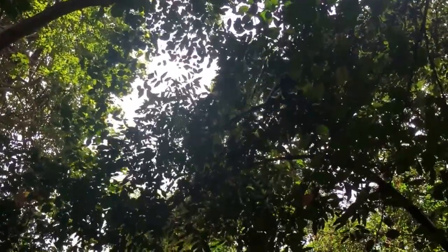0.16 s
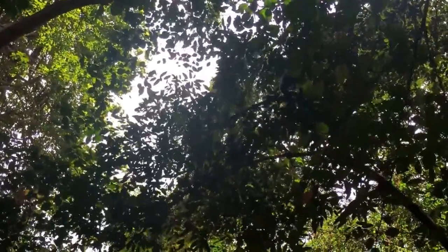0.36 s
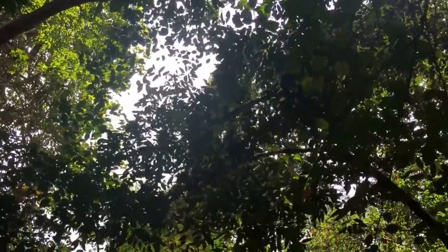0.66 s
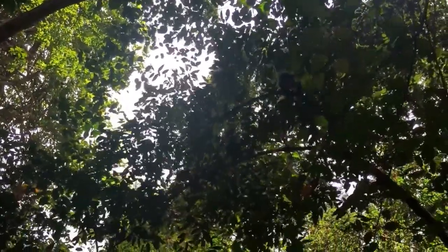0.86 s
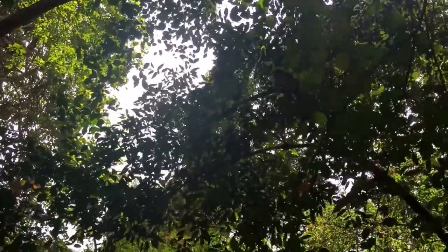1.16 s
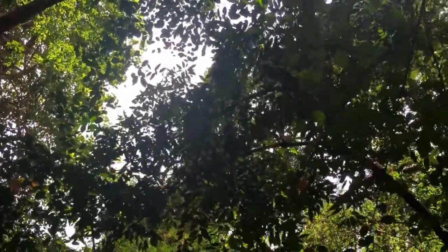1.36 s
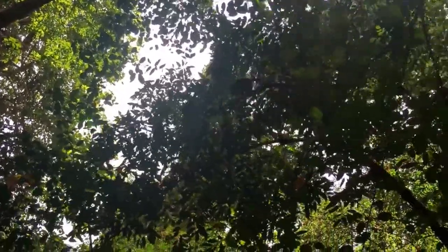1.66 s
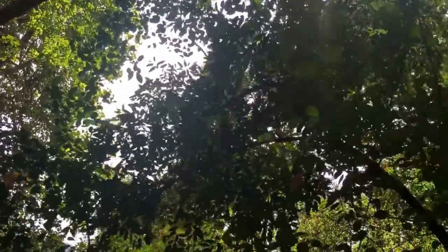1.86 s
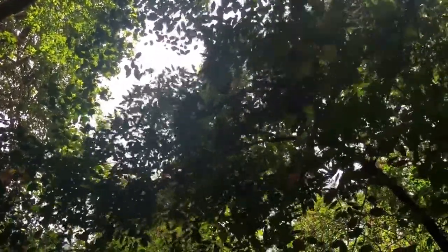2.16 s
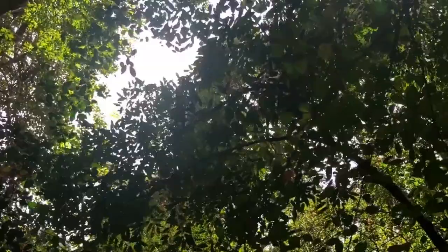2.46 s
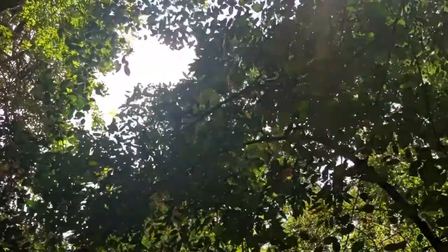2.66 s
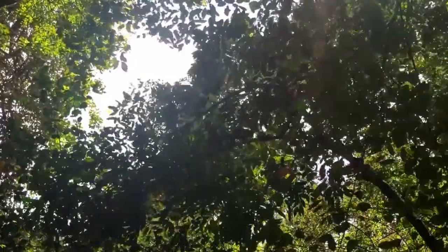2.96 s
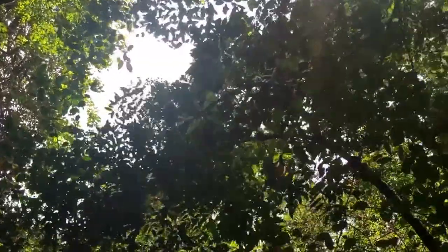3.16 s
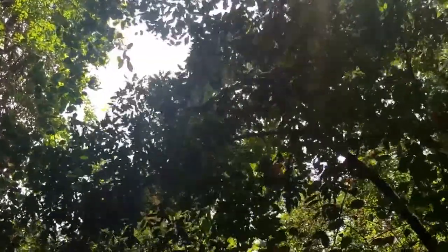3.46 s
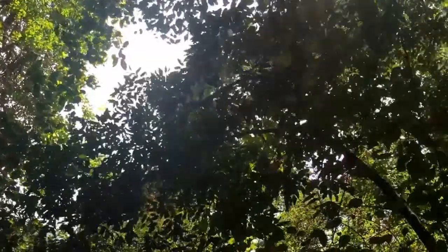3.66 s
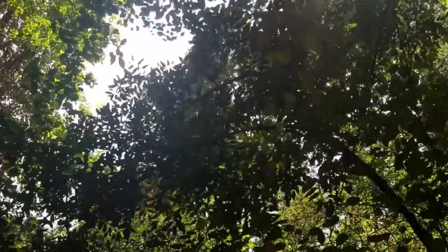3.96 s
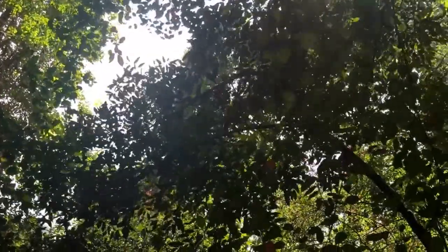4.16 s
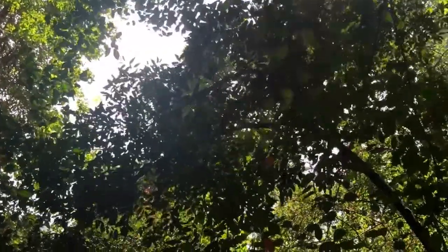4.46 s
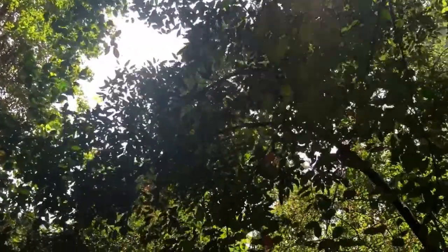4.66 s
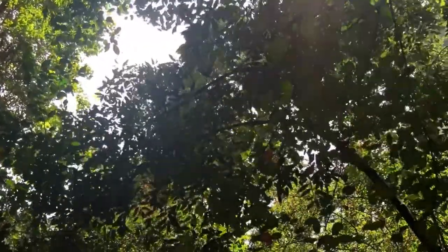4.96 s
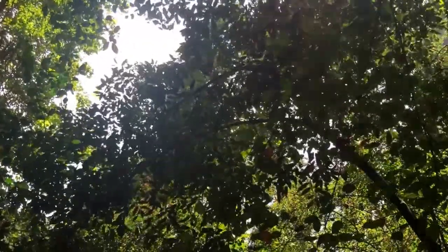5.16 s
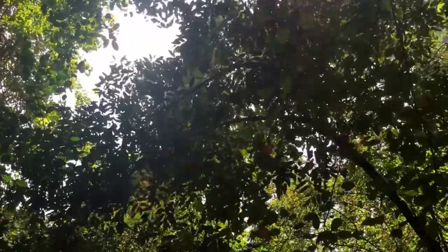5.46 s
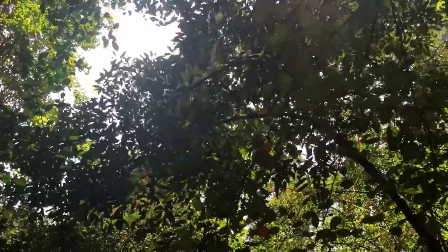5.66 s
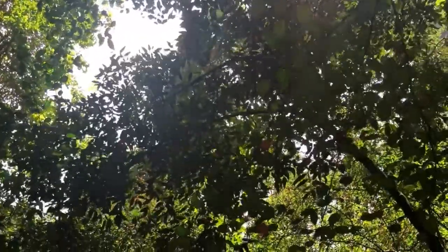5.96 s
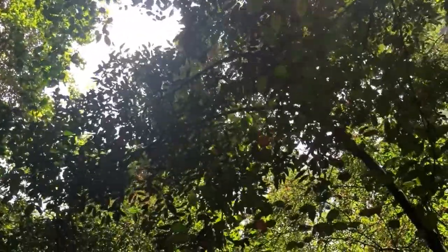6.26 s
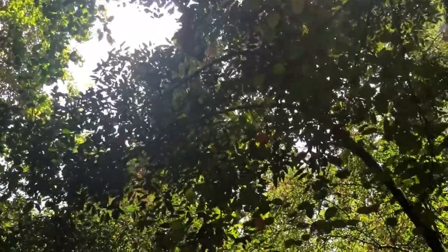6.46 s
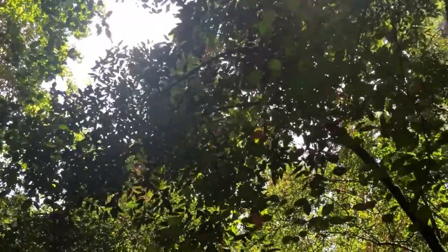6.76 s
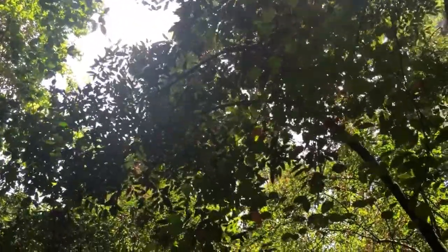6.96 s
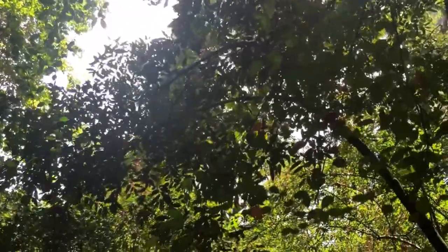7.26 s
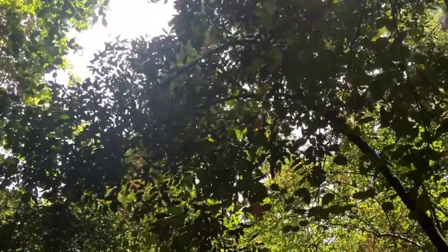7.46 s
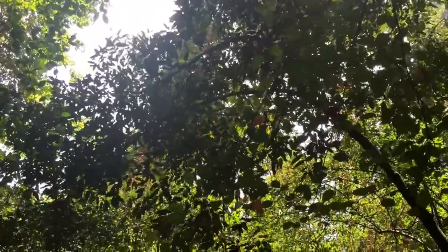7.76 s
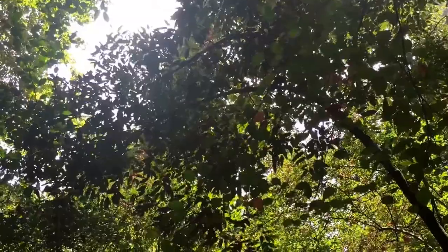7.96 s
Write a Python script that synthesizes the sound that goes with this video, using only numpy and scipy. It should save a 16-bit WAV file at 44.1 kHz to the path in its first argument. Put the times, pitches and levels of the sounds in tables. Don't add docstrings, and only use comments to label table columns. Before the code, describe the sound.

Under a leafy canopy outdoors, a dense insect chorus hisses steadily from start to finish, mostly bright and high, without distinct single chirps, gradually swelling to its fullest in the last seconds. A lower, drier insect band near 1.7 kHz rises to a peak around 2.2 s and settles by 3 s. Far away, a small engine throbs low and unevenly, fluttering and briefly dropping out, over a soft rumble of traffic and air with vague muffled murmurs of noise. Close by, leaves flick at 0.3 to 0.5 s with small twig clicks. From 1.05 s a stronger brush begins, a thick crackle with clustered snaps at 1.2 to 1.3 s and 1.6 to 1.75 s, easing until 2.8 s. Tiny rustles follow at 3.2, 5.7 and 7.4 s, with a last light touch and clicks around 8 s. The sound is natural, essentially mono, with close foliage against a distant background.

```python
import sys
import numpy as np
from scipy import signal
from scipy.fft import rfft, irfft
from scipy.io import wavfile
from scipy.ndimage import uniform_filter1d, map_coordinates

SR = 44100
rng = np.random.default_rng(int(sys.argv[2]) if len(sys.argv) > 2 else 0)


def pcm_store(signal):
    levels = np.round(np.clip(np.atleast_2d(signal), -1, 1) * 32767)
    wavfile.write(sys.argv[1], SR, levels.astype(np.int16).T)


def rack_gain(trim_db):
    fader = np.asarray(trim_db, float)
    return 10 ** (fader / 20)


N = 358077

# start_s [s], firing_hz [Hz], load_db [dB], facing_db [dB]
ENGINE_RUN = [(0, 74.7, -3, -1), (.5, 75.2, -2, 6), (.9, 75.53, -1, 7), (1.45, 75.26, 4.5, -8),
              (1.9, 73.8, -0.5, -4), (2.4, 75.65, -5, -9), (2.8, 77.3, -2.5, -2), (3.3, 75.44, 3, -2),
              (3.8, 73.86, 2, -3), (4.1, 76.15, -3, 2), (4.5, 77.06, -3.5, 8), (4.9, 78.1, 1.5, -4),
              (5.4, 78.2, 2, 4), (6.1, 77.9, 3, -5), (6.7, 75.5, 3, 4.5), (7.1, 73.65, 1.5, 6.5),
              (7.5, 74.23, 6, -1), (8.12, 74.15, 1, 4)]


def evened(x):
    return x / np.sqrt(np.mean(x ** 2) + 1e-20)


def curves(rows, t):
    s, *columns = np.transpose(rows)
    return [np.interp(t, s, column) for column in columns]


def smooth(points, hz):
    f, db = np.transpose(points)
    return rack_gain(np.interp(np.log(hz + 1), np.log(f + 1), db))


def humps(modes, hz):
    power = 0
    for centre_hz, width_hz, db in modes:
        offset = 2 * (hz - centre_hz) / width_hz
        power = power + (rack_gain(db) / (1 + offset ** 2) ** 1.014) ** 2
    return np.sqrt(power)


def above(x, hz):
    return signal.sosfiltfilt(signal.butter(2, hz / (SR / 2), "high", output="sos"), x)


def drift(shape, *spans):
    field = rng.standard_normal(shape)
    for axis, span in enumerate(spans):
        field = uniform_filter1d(uniform_filter1d(field, span, axis), span, axis)
    return evened(field)


def hiss(colour, table, patchy_db, flicker_db, size=512):
    speckle_db = 2.3
    hop = size // 4
    frames, hz = N // hop + 5, np.fft.rfftfreq(size, 1 / SR)
    shape = (len(hz), frames)
    patches = drift(shape, 6, 4096 // size)
    flicker = drift(frames, 2048 // size)
    z = rng.standard_normal(shape) + 1j * rng.standard_normal(shape)
    specks = drift(shape, 1, 6)
    gain_db = speckle_db * specks + patchy_db * patches + flicker_db * flicker
    z = z * colour(table, hz)[:, None] * rack_gain(gain_db)
    return evened(signal.istft(z, nperseg=size, noverlap=size - hop)[1][:N])


def throbs(t):
    # middle_s [s], lift_db [dB]
    beats = [(.07, 8), (.5, 9), (.79, 2), (1.03, -2), (1.54, 4), (1.68, 3), (2.18, 6.5), (2.26, -26),
             (2.42, 10), (2.62, 12.5), (3.27, 4), (3.45, 3.5), (4.02, -9), (4.09, 8), (4.17, -6),
             (4.37, 7.5), (4.6, -6), (4.7, -2), (4.85, 1), (5.05, -1), (6.06, -2), (6.2, -16), (6.56, 10),
             (6.96, 6.5), (7.13, -10), (7.49, 3), (7.69, -7), (8.06, 10)]
    half_s = 0.023
    return sum(db * np.exp(-((t - s) / half_s) ** 2) for s, db in beats)


def wash(t):
    # pitch_hz [Hz], level_db [dB per Hz]
    rumble_colour = [(20, -42), (40, -19.5), (70, 1), (110, -1), (200, 2.5), (320, -6), (450, -15),
                     (750, -18), (1200, -20.5), (2500, -52), (4000, -49), (16000, -44)]
    # pitch_hz [Hz], width_hz [Hz], level_db [dB]
    murmur_band = [(610, 263, 0)]
    # middle_s [s], half_s [s], level_db [dB], pitch_hz [Hz]
    murmurs = [
        (0.065, 0.091, -65.5, 620),
        (.9, .15, -69, 620),
        (1.5, 0.96, -70.5, 560),
        (2.306, 0.072, -70, 600),
        (3.501, 0.035, -73, 600),
        (5.872, 0.054, -63.5, 523.5),
        (6.6, .15, -72, 621),
        (7.502, 0.26, -65, 650.5),
    ]
    murmur_db, murmur_width_hz = -72.5, 153
    engine_db = curves(ENGINE_RUN, t)[1] + throbs(t)
    rumble_db = -57.5 + 0.38 * engine_db + 1.5 * drift(N, 3000)
    rumble = rack_gain(rumble_db) * hiss(smooth, rumble_colour, patchy_db=3.0, flicker_db=0.3, size=2048)
    out = rumble + rack_gain(murmur_db) * hiss(humps, murmur_band, patchy_db=7.0, flicker_db=0.0, size=1024)
    noise = rng.standard_normal(N)
    for s, half_s, db, hz in murmurs:
        band = signal.lfilter(*signal.iirpeak(hz, hz / murmur_width_hz, SR), noise)
        band = signal.lfilter(*signal.iirpeak(hz, hz / (2 * murmur_width_hz), SR), band)
        out = out + rack_gain(db) * np.exp(-((t - s) / half_s) ** 2) * evened(band)
    return out


def engine(t):
    orders_db = [-66.5, -60, -64, -71]
    fading_db, fading_s = 4.5, .04
    hz, load_db, facing_db = curves(ENGINE_RUN, t)
    load_db = load_db + throbs(t)
    turns = 2 * np.pi * np.cumsum(hz) / SR
    gusts = drift(N, 1800)
    out = np.zeros(N)
    for k, db in enumerate(orders_db):
        flutter, wander = drift(N, 1200), drift(N, 1300)
        fading = fading_db * np.tanh(drift(N, round(fading_s * SR)))
        order_db = db + load_db + fading + 2.5 * flutter + 1.2 * gusts
        if k == 0:
            order_db = order_db + facing_db
        out += rack_gain(order_db) * np.cos((k + 1) * turns + .8 * wander)
    return out


def stray_bands():
    # middle_s [s], low_hz [Hz], high_hz [Hz], level_db [dB]
    flecks = [
        (1.318, 4150, 5200, -61),
        (1.411, 7600, 9000, -59),
        (1.945, 9000, 10400, -64),
        (2.061, 4150, 5200, -62),
        (3.222, 6200, 7600, -58),
        (4.987, 7600, 9000, -58),
        (6.101, 4150, 5200, -61),
    ]
    size = 2048
    side, hz = np.zeros(N), np.fft.rfftfreq(size, 1 / SR)
    for s, low_hz, high_hz, db in flecks:
        band = irfft(rfft(rng.standard_normal(size)) * (hz > low_hz) * (hz < high_hz))
        start = round(s * SR) - size // 2
        side[start:][:size] = rack_gain(db) * evened(band) * signal.windows.hann(size)
    return np.array([side, -side])


def twigs():
    # start_s [s], peak_db [dB], ring_hz [Hz], t60_s [s]
    snaps = [(0.3057, -43.5, 1820, 0.02), (0.36, -61, 2500, 0.03), (0.4894, -48, 1800, 0.029),
             (0.73, -53, 2250, 0.04), (0.82, -53, 2206, 0.04), (1.0879, -42, 4000, 0.02),
             (1.1638, -46, 3680, 0.02), (1.2104, -47, 3800, 0.02), (1.2241, -42, 2643, 0.025),
             (1.2354, -39, 3980, 0.021), (1.2384, -38, 4300, 0.011), (1.257, -39, 1920, 0.018),
             (1.2744, -43, 2390, 0.02), (1.3294, -45, 1617, 0.024), (1.5539, -52, 2190, 0.016),
             (1.5723, -51, 2350, 0.018), (1.5994, -53, 2426, 0.019), (1.6372, -41, 2520, 0.02),
             (1.6474, -46, 2170, 0.018), (1.7145, -45, 2347, 0.02), (1.7394, -57, 4270, 0.019),
             (1.7594, -45, 1930, 0.02), (2.4194, -52, 1700, 0.021), (3.1694, -58, 3880, 0.022),
             (3.2595, -57, 3900, 0.025), (7.4494, -53, 4090, 0.02), (7.9907, -56, 4220, 0.02),
             (8.0394, -51, 4550, 0.016)]
    out, t = np.zeros(N + SR), np.arange(3000) / SR
    for s, db, hz, t60 in snaps:
        splinter = uniform_filter1d(rng.standard_normal(len(t)), size=4)
        ring = np.sin(2 * np.pi * hz * t) + 0.15 * splinter
        out[round(s * SR):][:len(t)] += rack_gain(db - 60 * t / max(t60, .002)) * ring
    return out[:N]


def stroke(t, start, hold, db):
    rise_s, release_db_per_s = 0.0092, 183
    settle_db, settle_db_per_s = -10, 24
    after = np.maximum(t - start - rise_s - hold, 0)
    tail = np.maximum(rack_gain(-release_db_per_s * after), rack_gain(settle_db - settle_db_per_s * after))
    return (rack_gain(db) * np.clip((t - start) / rise_s, 0, 1) * tail) ** 2


def leaves(t):
    # pitch_hz [Hz], level_db [dB per Hz]
    leaf_colour = [(400, -13.5), (800, -12.5), (1500, -5), (2300, 0.5), (2850, -1), (3500, -1),
                   (4200, -4.5), (6000, -9), (10000, -18.5), (15000, -17)]
    # start_s [s], hold_s [s], level_db [dB], weight_db [dB]
    strokes = [(0.293, .02, -62.5, -0.5), (.44, .07, -69, -12), (1.067, 0.03, -61, -5),
               (1.158, .02, -64, -13), (1.204, 0.064, -55, 0), (1.3, 0.264, -59, 1),
               (1.553, 0.058, -55.5, -3.5), (1.624, 0.053, -54, -2), (1.707, 0.046, -58.5, 1.5),
               (1.79, 0.29, -61, -1), (2.146, 0.22, -61, -2.5), (2.415, 0.024, -61.5, -3),
               (2.517, 0.3, -63.5, 1), (3.16, 0.014, -70, -9), (3.25, .015, -67, -4),
               (7.433, 0.046, -72, -11), (5.69, .06, -68.5, -3), (7.966, 0.073, -68.5, -10),
               (8.104, 0.021, -65, 3)]
    # time_s [s], level_db [dB], weight_db [dB]
    stirring = [
        (0, -77, 1.5),
        (.5, -73.5, 0),
        (1.05, -64.5, -3),
        (3.0, -70, -3.5),
        (4.5, -72.5, 0.5),
        (5.75, -75.5, 4.5),
        (6.5, -78.5, 4),
        (8.12, -83, 7.5),
    ]
    stir_db, stir_weight_db = curves(stirring, t)
    light, heavy = rack_gain(stir_db) ** 2, rack_gain(stir_db + stir_weight_db) ** 2
    for start, hold, db, weight_db in strokes:
        power = stroke(t, start, hold, db)
        light = light + power
        heavy = heavy + power * rack_gain(weight_db) ** 2
    sizes = rack_gain(2.6 * np.minimum(rng.exponential(1, N), 4))
    crackle = sizes * (rng.random(N) < 5000 / SR)
    grain = evened(uniform_filter1d(crackle, size=40) + 0.25)
    rustle = grain * hiss(smooth, leaf_colour, patchy_db=1.8, flicker_db=.2)
    low = signal.lfilter(*signal.butter(2, 1500 / (SR / 2)), rustle)
    return rack_gain(6.0) * (np.sqrt(light) * (rustle - low) + rack_gain(8.5) * np.sqrt(heavy) * low)


def chorus(t):
    # time_s [s], effort_db [dB], near_db [dB]
    swell = [(0, -56, 2), (.18, -56, -1), (.61, -53, 0), (.99, -54.5, 0), (1.18, -53, -3), (1.3, -52, .5),
             (2.1, -50.5, 1.5), (2.58, -50.5, 0), (2.8, -52, 3.5), (3.25, -49.5, -0.5), (3.55, -50, 1.5),
             (3.75, -52, -1), (4.2, -52, -1.5), (5.4, -48.5, -.5), (5.61, -50, -1.5), (7.08, -47.5, 0),
             (7.17, -48.5, 0), (8.12, -47.5, -1)]
    # pitch_hz [Hz], width_hz [Hz], level_db [dB]
    voices = [(3304, 430, -8.5), (3580, 390, -16.5), (4182, 865, 1), (5657, 1050, 1.5), (7070, 3000, -2.5),
              (8790, 1700, -1.5)]
    # pitch_hz [Hz], width_hz [Hz], level_db [dB]
    top_voices = [(11300, 1100, 0), (12220, 1160, 0), (13900, 2000, -9)]
    # pitch_hz [Hz], width_hz [Hz], level_db [dB]
    drummers = [(1725, 115, 0), (1620, 300, -11), (1950, 450, -10)]
    # time_s [s], level_db [dB]
    drumming = [
        (0, -65),
        (.9, -64),
        (1.4, -61.5),
        (2.2, -59.5),
        (2.7, -63.5),
        (3.5, -65),
        (5.0, -66.5),
        (5.7, -66),
        (7.0, -66),
        (8.12, -67),
    ]
    (effort_db, near_db), (drummers_db,) = curves(swell, t), curves(drumming, t)
    rise_db = effort_db + 50
    body = hiss(humps, voices, patchy_db=0.3, flicker_db=.25)
    edge = signal.butter(8, 3050 / (SR / 2), "high", output="sos")
    body = rack_gain(effort_db + 0.84) * signal.sosfilt(edge, body)
    upper = above(body, 3800)
    body = upper + (body - upper) * rack_gain(-.55 * rise_db)
    bright_db = -11.5 + near_db + 0.36 * rise_db
    top = rack_gain(effort_db + bright_db + .3) * hiss(humps, top_voices, patchy_db=-0.6, flicker_db=.5)
    small = body + top
    shimmer = rack_gain(0.28 * drift(N, 400))
    small = small + above(small, 7960) * (shimmer - 1)
    low = hiss(humps, drummers, patchy_db=.4, flicker_db=.7, size=1024)
    clock = np.cumsum(1 + .008 * drift(N, 3000))
    return small + rack_gain(drummers_db + 2.5) * map_coordinates(low, [clock], order=3, mode="mirror")


def scene():
    t = np.arange(N) / SR
    mono = chorus(t) + engine(t) + wash(t) + leaves(t) + twigs()
    return np.array([mono, mono])


def low_pass(x):
    return signal.sosfilt(signal.butter(12, 15300, fs=SR, output="sos"), x)


def record(dry):
    mix = dry + stray_bands()
    return low_pass(mix)


dry = scene()
out = record(dry)
pcm_store(out)
```